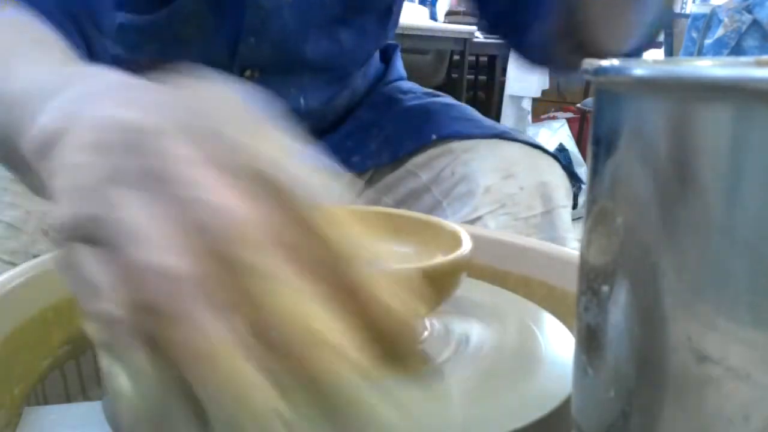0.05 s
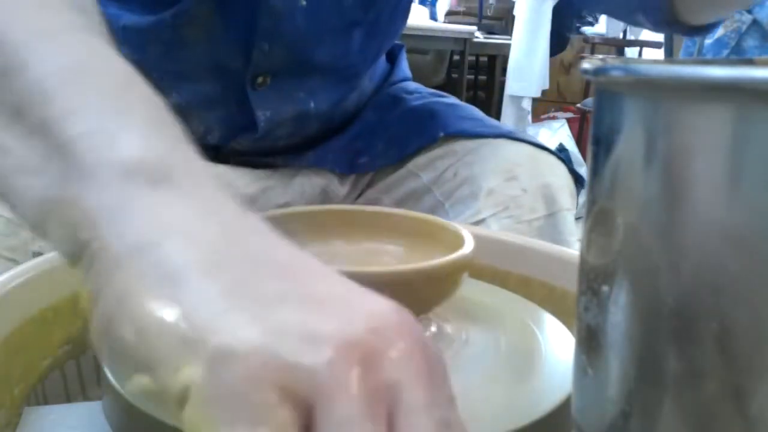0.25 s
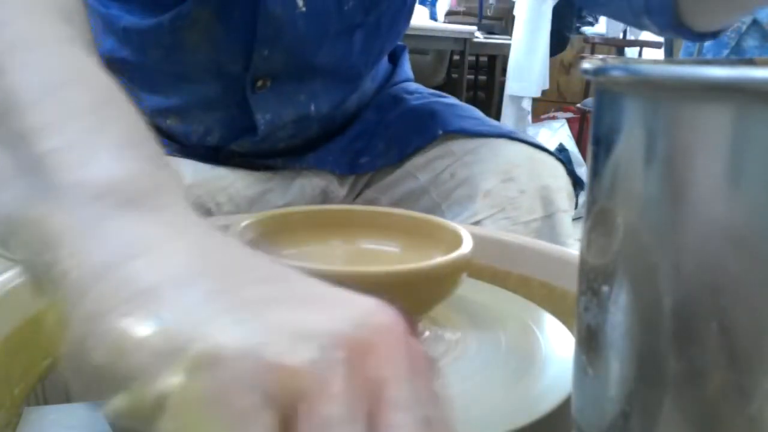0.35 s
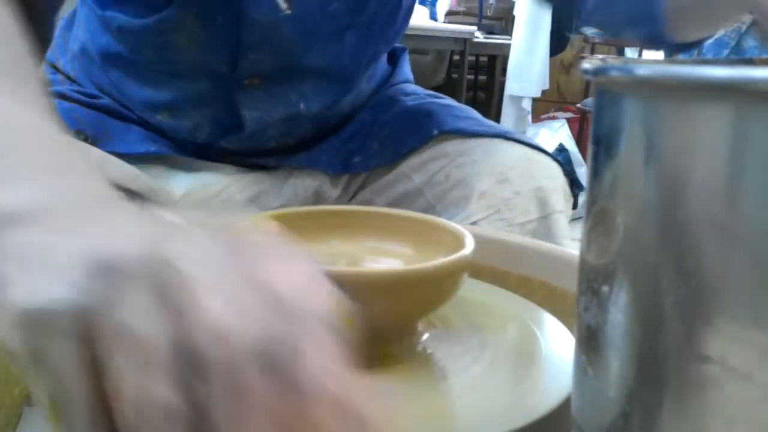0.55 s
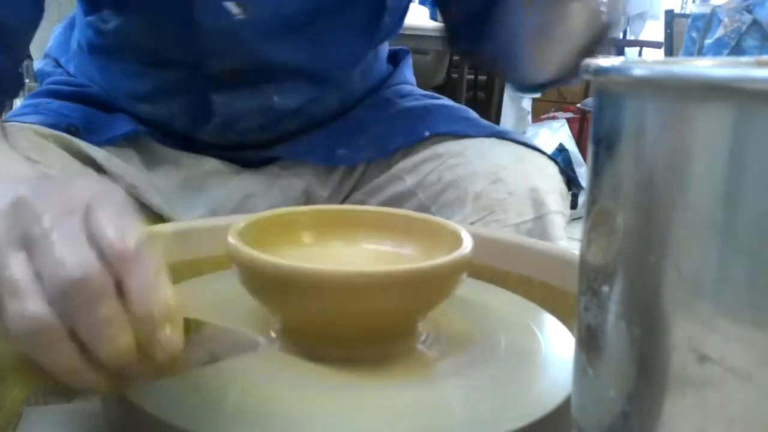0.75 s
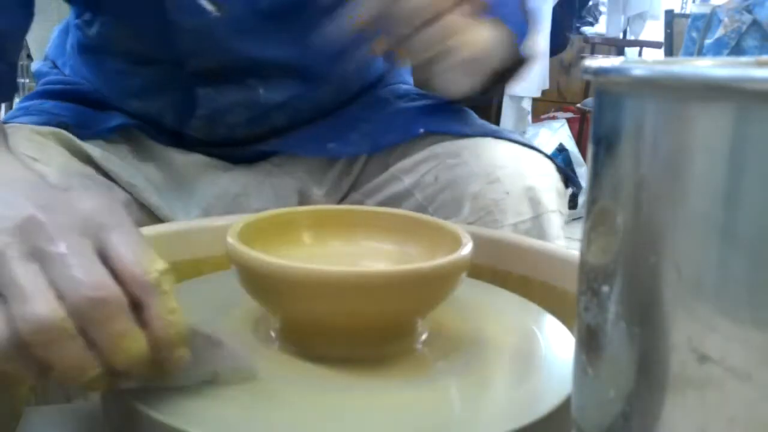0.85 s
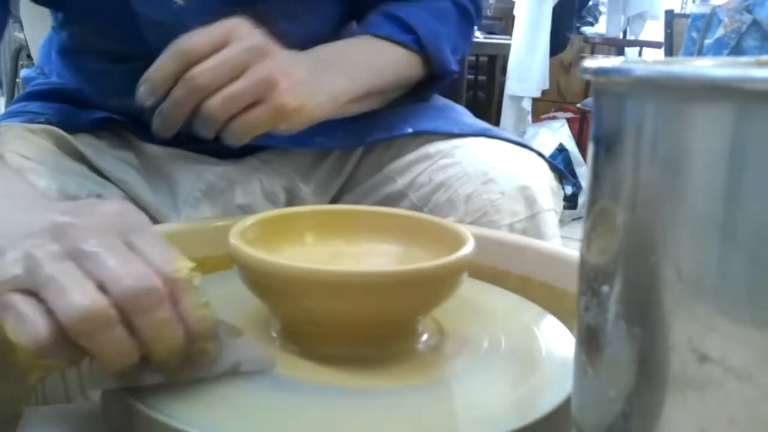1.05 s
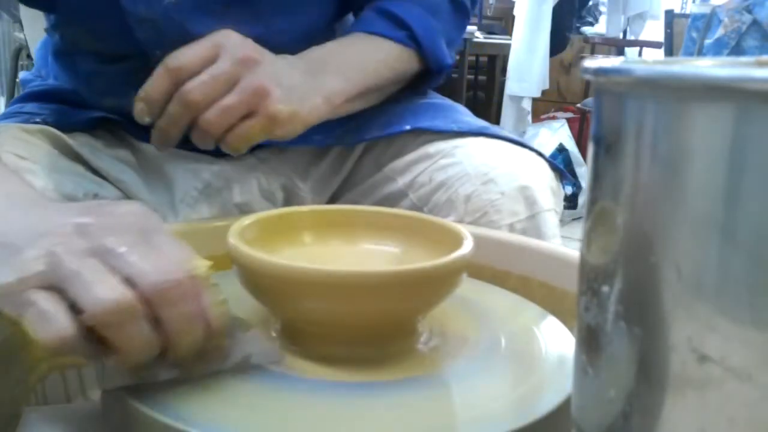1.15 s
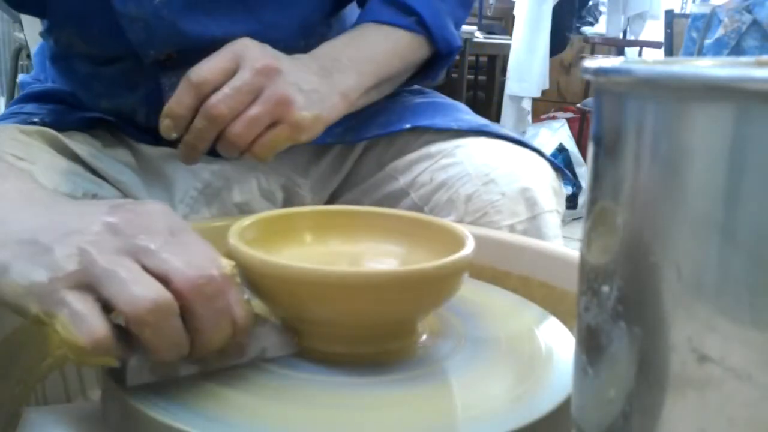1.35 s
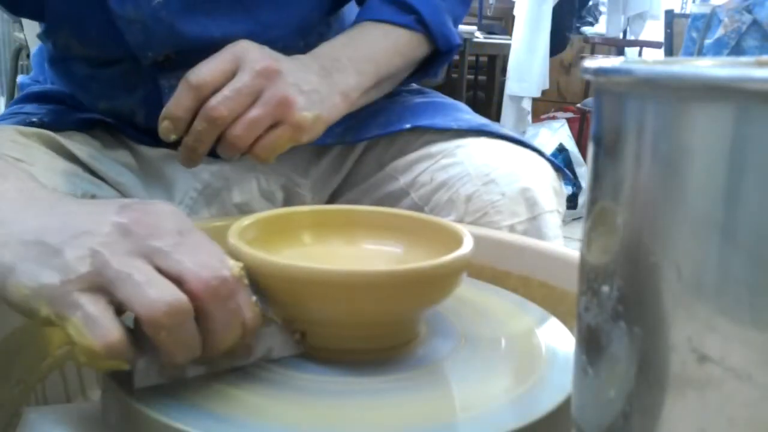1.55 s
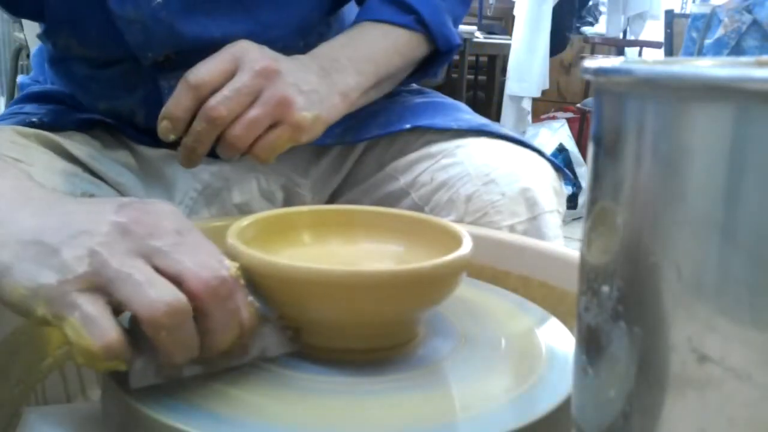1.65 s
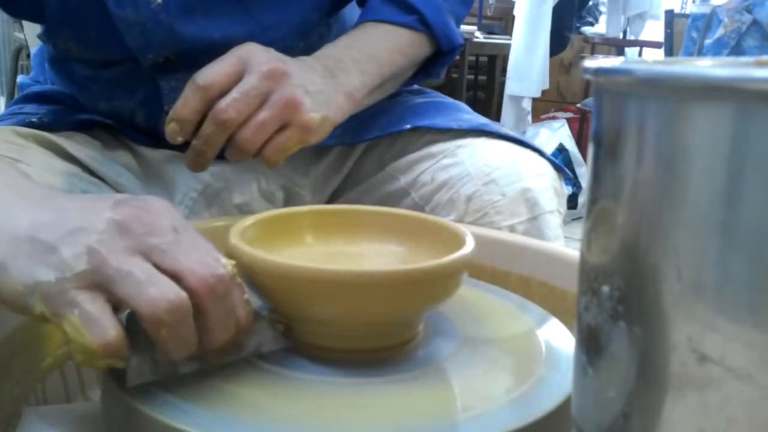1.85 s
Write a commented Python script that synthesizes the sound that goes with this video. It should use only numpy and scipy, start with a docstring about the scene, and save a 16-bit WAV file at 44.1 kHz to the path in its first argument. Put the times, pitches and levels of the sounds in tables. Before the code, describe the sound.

Gritty, hissing scraping of clay on a humming pottery wheel follows some low plastic knocks.

```python
"""Scraping clay on a potter's wheel

A motor hums in a small workshop. A hand knocks about in the plastic splash tray, exciting its modes,
and picks up a flat blade, then sets it on the turning wet clay. Friction with grit hisses under the
edge and drives the blade's resonances, stick-slip makes it chirp now and then, and the scrape thins
out as the hand eases off."""
import sys
import numpy as np
from scipy import signal
from scipy.fft import rfft, irfft
from scipy.io import wavfile
from scipy.ndimage import uniform_filter1d

SR = 44100
rng = np.random.default_rng(int(sys.argv[2]) if len(sys.argv) > 2 else 0)


def int16_out(signal):
    """Quantize to a 16-bit WAV file."""
    q = np.round(np.clip(np.atleast_2d(signal).T, -1, 1) * 32767)
    wavfile.write(sys.argv[1], SR, q.astype(np.int16))


N = 83790
T = np.arange(N) / SR

# the motor's hum: time_s, level_db
HUM_LEVEL = [(0, -59.5), (0.5, -60.5), (0.8, -57), (1.0, -57.5), (1.25, -53.5), (1.5, -57.5), (1.9, -65.5)]
# steady noise of the drive and the room: frequency_hz, gain_db
FLOOR_SPECTRUM = [(20, -4), (50, 8), (90, -4.5), (140, -9), (250, -7), (360, -10), (440, 5), (540, -16.5),
                  (680, -5.5), (900, -12.5), (1200, -21.5), (3400, -23.5), (6000, -26), (15000, -30)]
# knocks on the tray: start_s, gain_db, cutoff_hz, wall_mode_gain_db
KNOCKS = [(0.189, -15, 6070, 1.5), (0.200, -13.5, 1390, -1.5), (0.207, -25.5, 5730, 0),
          (0.2744, -16, 1180, 4), (0.285, -28.5, 1010, -4), (0.311, -15, 1210, -12), (0.325, -20, 600, 11),
          (0.334, -13, 700, 8), (0.4905, 1, 3510, -2.5)]
# the tray's modes, one list per column: pitch_hz, level_db, t60_s
TRAY_HZ = [294, 402, 471, 544, 655, 688, 722, 801, 840, 995, 1076, 1506, 2890, 3470]
TRAY_DB = [-51.5, -30, -30.5, -30.5, -29, -20, -24.5, -29.5, -28.5, -32, -37, -43.5, -36, -30]
TRAY_T60_S = [0.67, 0.27, 0.36, 0.33, 0.32, 0.2, 0.3, 0.26, .2, 0.27, 0.21, 0.31, 0.19, 0.095]
# hollow and bright parts of the tray's dense ring: frequency_hz, gain_db
HOLLOW_SPECTRUM = [(100, -26), (240, -24), (400, -6.5), (700, 3.5), (1000, -7), (1300, -12.5), (1750, -28),
                   (3000, -54)]
CLACK_SPECTRUM = [(1000, -16), (1750, -8), (2600, -1), (3400, -4), (4500, -10), (6000, -17.5), (9000, -25),
                  (15000, -18)]
# thuds of the hand against the tray: start_s, level_db
THUDS = [(0.194, -44.5), (0.27, -54.5), (0.521, -50.5)]
# their dull spectrum: frequency_hz, gain_db
THUD_SPECTRUM = [(30, -13), (70, 6), (150, -6.5), (320, 1.5), (600, -37), (2000, -84.5)]
# slides as the blade is picked up: centre_s, spread_s, level_db
SLIDES = [(0.311, 0.024, -57), (0.40, 0.036, -56.5), (0.401, 0.0035, -51.5), (0.411, 0.0035, -49.5)]
# their friction noise: frequency_hz, gain_db
SLIDE_SPECTRUM = [(800, 5), (1800, -6.5), (2800, -1), (3600, -0.5), (4500, -8), (5800, -6), (6500, -7.5),
                  (7500, -12), (9500, -15), (15000, -31)]
# pressure of the edge on the clay, as the level of the hiss: time_s, level_db
PRESSURE = [(0.843, -105), (0.846, -52), (0.86, -52.5), (0.895, -44), (0.97, -41), (1.03, -39.5),
            (1.08, -40.5), (1.11, -40.5), (1.24, -40.5), (1.30, -43.5), (1.39, -46), (1.46, -46.5),
            (1.565, -49), (1.605, -54.5), (1.70, -59.5), (1.76, -61.5), (1.81, -59.5), (1.9, -63.5)]
# hiss of grit under the edge: frequency_hz, gain_db
HISS_SPECTRUM = [(250, -21), (450, -21.5), (1000, -19), (1300, -6), (1480, -19), (1680, -17.5),
                 (1850, -18.5), (2400, -5), (2600, -7.5), (2780, -11.5), (3100, -7.5), (3700, -6),
                 (4050, -4), (4450, -5), (4900, -2), (5200, -7), (5550, 2), (6700, -9.5), (7900, -4),
                 (8350, -6), (8800, -7), (9600, -14), (10500, -20.5), (14000, -25), (16000, -34)]
# the blade's resonances, one list per column:
# pitch_hz, width_hz, full_pressure_level_db, bump_level_db, pressure_slope_db_per_db
BLADE_HZ = [425, 472, 643, 783, 862, 1815, 2899, 2990, 3275, 3485, 3566, 3665, 3839, 4192, 4724, 4990, 7680,
            8019]
BLADE_WIDTH_HZ = [29.5, 10.7, 10.1, 90, 35, 29, 17.6, 13.3, 26, 69, 7.4, 8.3, 33, 16, 16, 86, 57, 96]
BLADE_RUB_DB = [-62, -60.5, -58.5, -52.5, -42.5, -52.5, -41.5, -45, -51.5, -43.5, -44, -53, -33.5, -48, -51,
                -57, -47, -62]
BLADE_BUMP_DB = [-46.5, -86, -37, -42, -31, -57, -57, -69, -62, -67, -55, -66, -40.5, -53, -48.5, -66, -51,
                 -60]
BLADE_SLOPE = [0.34, 0.37, 0.5, 0.7, 1.13, 1.06, 1.09, 0.92, 0.69, 1.23, 1, 2.1, 3.8, 1.6, 1.12, 0.57, 1.8,
               2]
# depth of the cut, as the gain of the rasp: time_s, gain_db
CUT_DEPTH = [(0.843, -62), (0.86, -22), (0.89, -7), (0.95, -19), (1.03, 0.5), (1.08, 2.5), (1.12, -2),
             (1.22, -14), (1.3, -21), (1.41, -10.5), (1.445, -8.5), (1.48, -11), (1.562, -8.5), (1.62, -38)]
# the rasp's broad resonances: centre_hz, width_hz, level_db
RASP_BANDS = [(2310, 460, -48), (3710, 660, -41)]
# bumps of the blade on the clay: start_s, gain_db
BUMPS = [(0.846, -16), (0.8545, 0), (0.876, 0), (1.213, -6.5), (1.23, -14), (1.244, -5)]
# stick-slip chirps of the edge: start_s, hold_s, level_db, pitch_hz
CHIRPS = [(0.923, 0.0049, -30, 2975), (0.957, 0.0054, -41, 2930), (1.256, 0.0054, -36, 2910),
          (1.325, 0.0059, -39, 3450), (1.527, 0.0098, -38.5, 2980), (1.577, 0.015, -46, 3250),
          (1.626, .014, -43, 2890), (1.77, 0.026, -55.5, 2920), (1.793, 0.023, -54.5, 3480),
          (1.857, 0.0065, -51.5, 3010)]


def from_db(db):
    """Amplitude grows tenfold for every 20 dB."""
    return 10 ** (np.asarray(db) / 20)


def rms_one(x):
    """Division by the RMS value gives unit power."""
    return x / np.sqrt(np.mean(x ** 2) + 1e-20)


def curve(rows):
    """Linear interpolation joins (time_s, value) points."""
    return np.interp(T, *np.transpose(rows))


def noise():
    """Independent Gaussian samples make white noise."""
    return rng.standard_normal(N)


def colour(x, spectrum):
    """Spectral shaping by (frequency_hz, gain_db) points, at unit power."""
    hz, db = np.transpose(spectrum)
    bins = np.maximum(np.fft.rfftfreq(N, 1 / SR), 1)
    gain = from_db(np.interp(np.log(bins), np.log(hz), db))
    return rms_one(irfft(rfft(x) * gain, N))


def drift(rate_hz):
    """Low-passed noise wanders about zero with unit spread."""
    bins = np.fft.rfftfreq(N, 1 / SR)
    return rms_one(irfft(rfft(noise()) * (bins > 0) / (1 + (bins / rate_hz) ** 2), N))


def ring(x, hz, width_hz):
    """A two-pole resonator answers a unit impulse with a damped sine."""
    radius, angle = np.exp(-np.pi * width_hz / SR), 2 * np.pi * hz / SR
    return signal.lfilter([0, np.sin(angle)], [1, -2 * radius * np.cos(angle), radius ** 2], x + 1e-18)


def fade(t, t60_s):
    """Exponential decay, from a full level held until t = 0."""
    return np.exp(-np.log(1000) * np.maximum(t, 0) / t60_s)


def swell(centre_s, spread_s):
    """A Gaussian envelope rises and falls."""
    return np.exp(-.5 * ((T - centre_s) / spread_s) ** 2)


def even(x, window_s):
    """Division by the running RMS holds a noise at unit power."""
    return x / np.sqrt(uniform_filter1d(x ** 2, size=int(window_s * SR)) + 1e-12)


def bass_cut(x, hz):
    """A steep high-pass: small bodies radiate little bass."""
    return signal.sosfilt(signal.butter(4, hz, "high", fs=SR, output="sos"), x)


def wheel():
    """The motor hums in two harmonics, louder under load, over broadband drive and room noise."""
    pitch_hz = 52.2 * (1 + 0.018 * drift(rate_hz=3.9))
    phase = 2 * np.pi * np.cumsum(pitch_hz) / SR
    level_db = curve(HUM_LEVEL) + 1.7 * drift(rate_hz=2)
    hum = np.sqrt(2) * from_db(level_db) * (np.sin(phase) + from_db(-17) * np.sin(2 * phase))
    return hum + from_db(-60) * colour(noise(), FLOOR_SPECTRUM)


def tray():
    """Impacts excite damped modes and a dense, noise-like ring; softer contact passes less treble."""
    out = np.zeros(N)
    wall_mode_hz, crack_hold_s = 402, 0.012
    crack = from_db(-33) * fade(T - crack_hold_s, t60_s=0.015)
    wash_envelope = crack + from_db(-29.5) * fade(T, t60_s=0.33)
    for start_s, gain_db, cutoff_hz, wall_db in KNOCKS:
        modes = np.zeros(N)
        for hz, level_db, t60_s in zip(TRAY_HZ, TRAY_DB, TRAY_T60_S):
            envelope = from_db(level_db + wall_db * (hz == wall_mode_hz)) * fade(T, t60_s)
            modes += envelope * np.sin(2 * np.pi * hz * T + rng.uniform(0, 2 * np.pi))
        hollow = even(colour(noise(), HOLLOW_SPECTRUM), window_s=0.0045)  # evened to die smoothly
        clack = from_db(-6) * colour(noise(), CLACK_SPECTRUM)
        contact = signal.butter(2, cutoff_hz, fs=SR, output="sos")
        knock = signal.sosfilt(contact, modes + wash_envelope * (hollow + clack))
        start = int(start_s * SR)
        out[start:] += from_db(gain_db) * knock[:N - start]
    return bass_cut(out, hz=310)


def thuds():
    """The soft impact of the hand puts its energy into low frequencies."""
    attack_s = 0.0074
    envelope = sum(from_db(db) * np.clip((T - start_s) / attack_s, 0, 1) * fade(T - start_s, t60_s=0.26)
                   for start_s, db in THUDS)
    return envelope * colour(noise(), THUD_SPECTRUM)


def grit():
    """Friction noise is a smooth hiss plus the random impulses of single grains."""
    grains_per_s = 2200
    hits = rng.random(N) < grains_per_s / SR
    strength_db = 4.5 * np.minimum(rng.exponential(1, N), 4)
    grains = hits * from_db(strength_db) * rng.choice([-1, 1], N)
    return noise() + from_db(-6) * rms_one(grains)


def pick_up():
    """Sliding friction gives brief hisses and a thin squeak as the blade is lifted."""
    envelope = sum(from_db(db) * swell(centre_s, spread_s) for centre_s, spread_s, db in SLIDES)
    squeak_hz = 5450
    squeak = from_db(-62.5) * swell(centre_s=0.303, spread_s=0.0085) * np.sin(2 * np.pi * squeak_hz * T)
    return envelope * colour(grit(), SLIDE_SPECTRUM) + squeak


def reflections(x):
    """Early reflections from wheel, tray and bucket interfere with the sound and ripple its spectrum."""
    response = noise() * fade(T, t60_s=0.06)
    reflected = irfft(rfft(x) * rfft(response / np.linalg.norm(response)), N)
    return rms_one(x + from_db(-3) * reflected)


def scrape():
    """Forced vibration: grit hisses under the edge and drives the blade's resonances as pressure rises."""
    full_pressure_db = -36
    hiss_db = curve(PRESSURE) + 1.02 * drift(rate_hz=15)
    load_db = hiss_db - full_pressure_db
    touching = T > PRESSURE[0][0]
    out = from_db(hiss_db) * reflections(colour(grit(), HISS_SPECTRUM))
    for hz, width_hz, rub_db, slope in zip(BLADE_HZ, BLADE_WIDTH_HZ, BLADE_RUB_DB, BLADE_SLOPE):
        band = signal.butter(2, [hz - 4 * width_hz, hz + 4 * width_hz], "band", fs=SR, output="sos")
        resonance = rms_one(signal.sosfilt(band, ring(grit(), hz, width_hz)))
        out += touching * from_db(rub_db + slope * load_db) * resonance
    return out


def rasp():
    """Tearing clay radiates coarse bands of noise that grow with the depth of the cut."""
    bands = sum(from_db(db) * rms_one(bass_cut(ring(grit(), hz, width_hz), hz - width_hz))
                for hz, width_hz, db in RASP_BANDS)
    return from_db(curve(CUT_DEPTH)) * bands


def bumps():
    """Free vibration: after a bump on the clay the blade rings with less damping than while it rubs."""
    width_ratio = 0.59
    impulses = sum(from_db(db) * (np.arange(N) == int(start_s * SR)) for start_s, db in BUMPS)
    out = np.zeros(N)
    for hz, width_hz, db in zip(BLADE_HZ, BLADE_WIDTH_HZ, BLADE_BUMP_DB):
        out = from_db(db) * ring(impulses, hz, width_ratio * width_hz) - out  # modes alternate in sign
    return bass_cut(out, hz=380)


def chirps():
    """Stick-slip oscillation: the edge catches and sings briefly on a wavering note."""
    attack_s, waver_hz = 0.003, 45
    out = np.zeros(N)
    for start_s, hold_s, db, pitch_hz in CHIRPS:
        age_s = T - start_s
        envelope = from_db(db) * np.clip(age_s / attack_s, 0, 1) * fade(age_s - hold_s, t60_s=0.07)
        phase = 2 * np.pi * np.cumsum(pitch_hz + waver_hz * drift(rate_hz=120)) / SR
        out += envelope * np.sin(phase)
    return out


def scene():
    """Superposition: the sounds of the handwork and the wheel add in one channel."""
    handwork = tray() + thuds() + pick_up() + scrape() + rasp() + bumps() + chirps()
    return (handwork + wheel())[None]


def record(dry):
    """Band limiting: a steep elliptic low-pass removes the highest treble."""
    cutoff_hz = 15750
    return signal.sosfilt(signal.ellip(12, .1, 80, cutoff_hz, fs=SR, output="sos"), dry)


dry = scene()
out = record(dry)
int16_out(out)
```